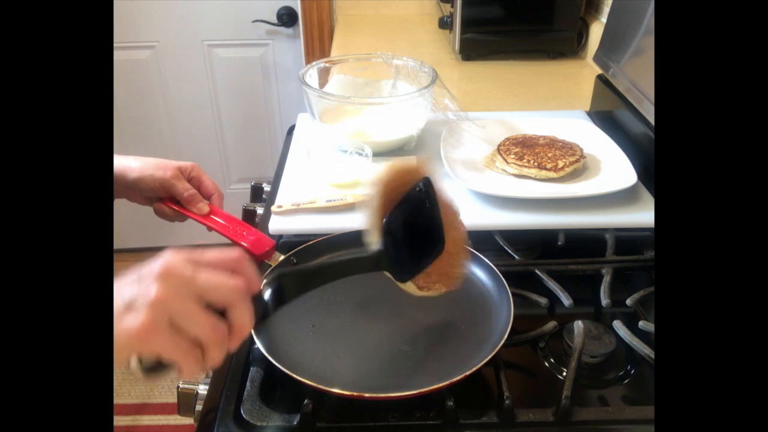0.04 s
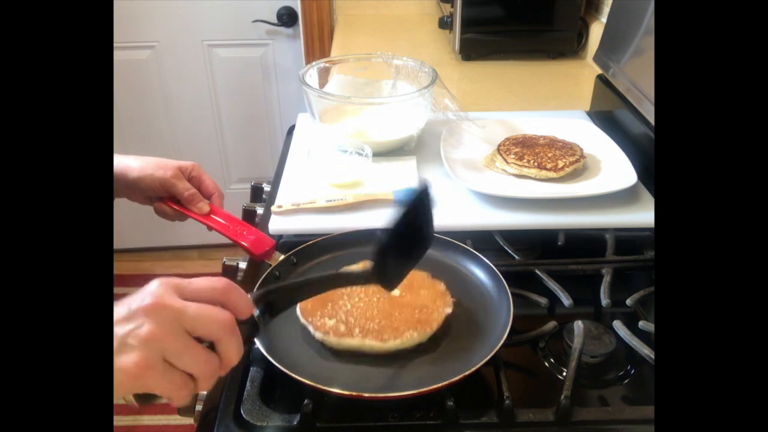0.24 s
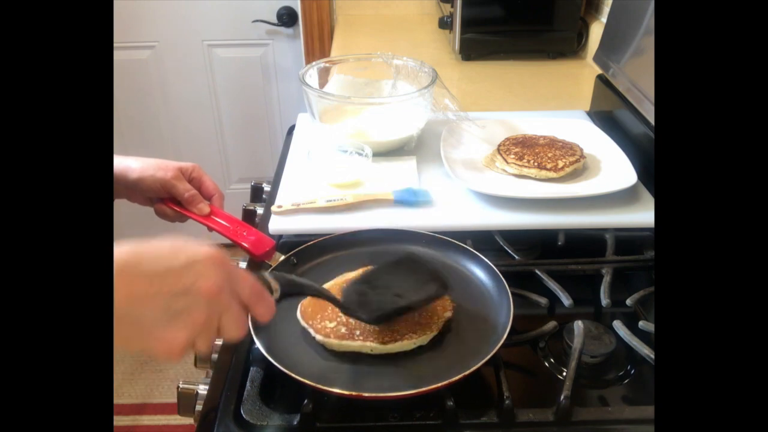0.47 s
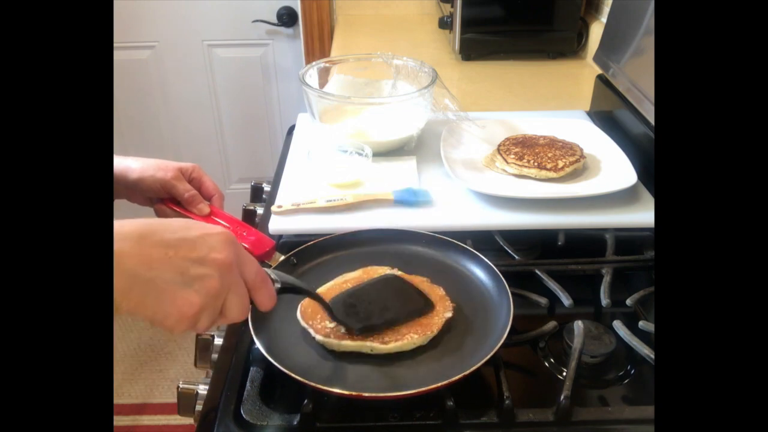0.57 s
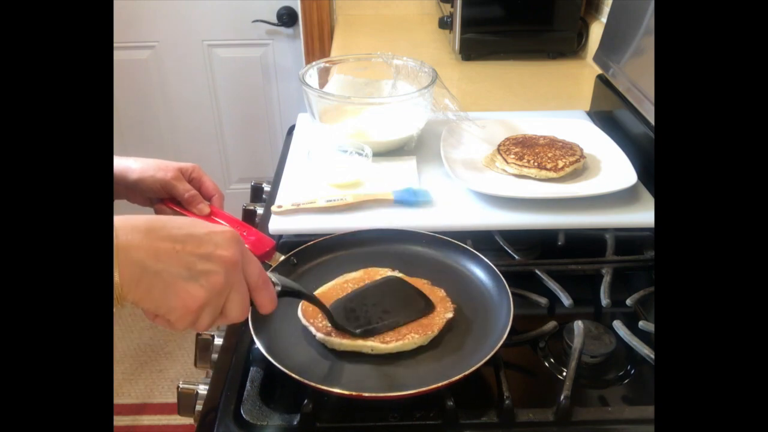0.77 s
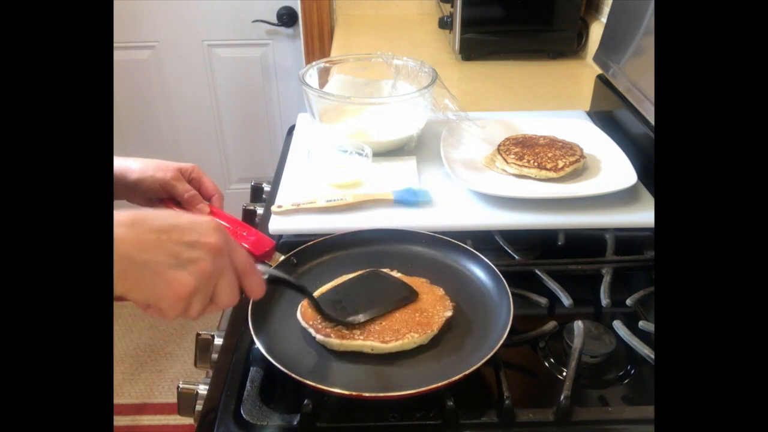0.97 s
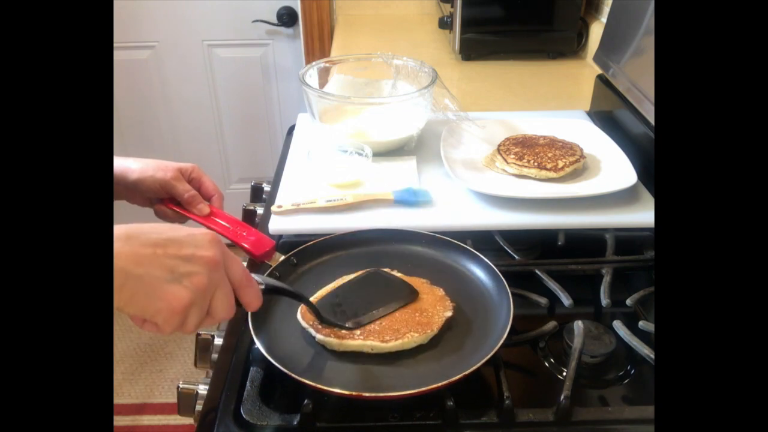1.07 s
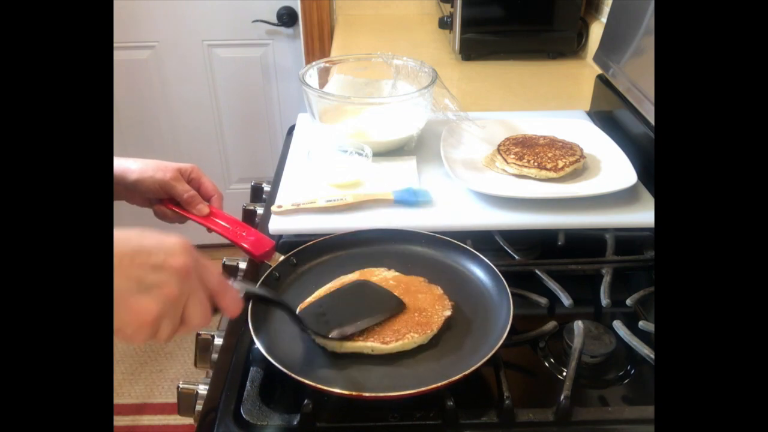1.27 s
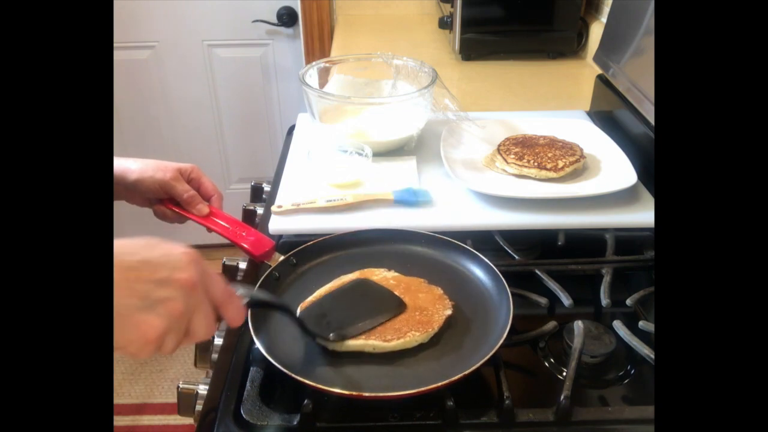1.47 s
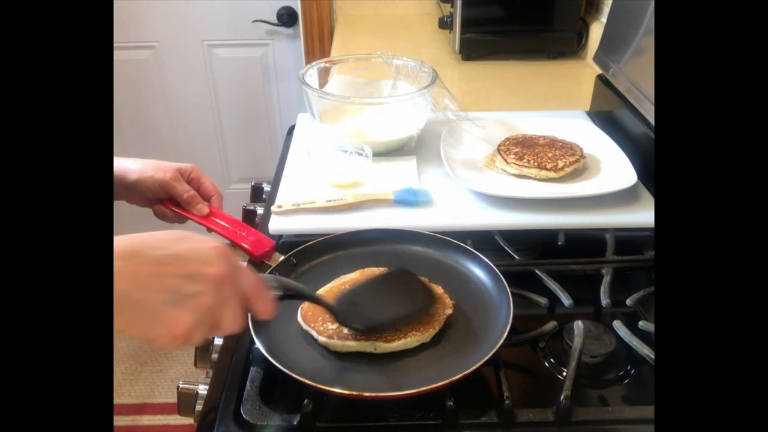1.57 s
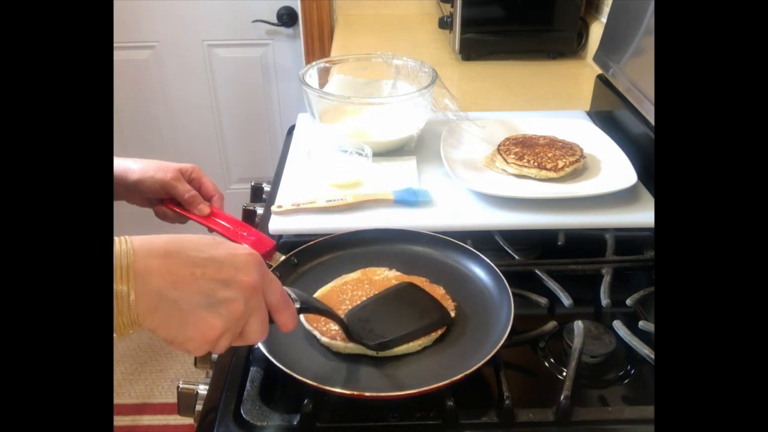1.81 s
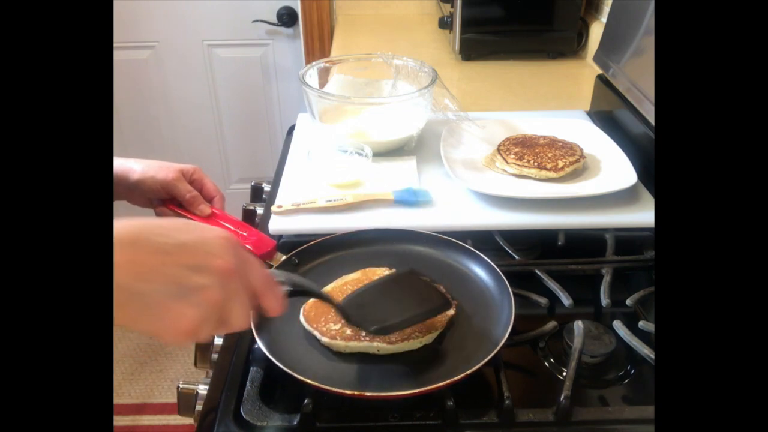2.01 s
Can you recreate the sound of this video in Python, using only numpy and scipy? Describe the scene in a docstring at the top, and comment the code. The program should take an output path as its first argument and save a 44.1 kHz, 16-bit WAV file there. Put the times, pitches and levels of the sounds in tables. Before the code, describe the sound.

Close above a stove, a spatula knocks a nonstick pan as a pancake slaps down; faint sizzling and crackles follow, then quiet pats and a duller knock, over steady appliance hum and light room hiss.

```python
"""At a kitchen stove, close above a nonstick pan, a pancake is flipped. The spatula knocks on the pan, which
rattles on its grate: damped modes, clacking noise and room. The cake smacks down and the stove top thumps.
The wet side sizzles (filtered random grains) and spits (clicks with noise tails) for about half a second.
The spatula pats the cake and bumps the pan once more, softly; a fainter sizzle returns.
An appliance hums throughout with a faint high whine, over rumble and hiss shaped from noise."""
import sys
import numpy as np
from scipy import signal
from scipy.fft import rfft, irfft
from scipy.io import wavfile

SR = 44100
rng = np.random.default_rng(int(sys.argv[2]) if len(sys.argv) > 2 else 0)


def int16_out(signal):
    """Quantize to a 16-bit WAV file."""
    q = np.round(np.clip(np.atleast_2d(signal).T, -1, 1) * 32767)
    wavfile.write(sys.argv[1], SR, q.astype(np.int16))


N = 90404  # samples
T = np.arange(N) / SR  # s


def from_db(db):
    """Decibels to gain."""
    return 10 ** (np.asarray(db) / 20)


def rms_one(x):
    """Scale to unit RMS level."""
    return x / np.sqrt(np.mean(x ** 2) + 1e-20)


def at_hz(points, hz):
    """Read a table on a log-frequency axis."""
    table_hz, values = np.transpose(points)
    return np.interp(np.log(np.maximum(hz, 1)), np.log(table_hz), values)


def cut(x, hz, kind, order=2):
    """Low- or high-pass with a Butterworth filter."""
    sos = signal.butter(order, min(hz, SR / 2 - 1000), kind, fs=SR, output="sos")
    return signal.sosfilt(sos, x + 1e-18)


def coloured(x, spectrum):
    """Give a steady noise a spectrum; unit RMS level."""
    gain = from_db(at_hz(spectrum, np.fft.rfftfreq(N, 1 / SR)))
    return rms_one(irfft(rfft(x) * gain, N))


def drift(rate_hz):
    """Random wander with spread 1, made of noise that rolls off above rate_hz."""
    rolloff = 1 + (np.fft.rfftfreq(N, 1 / SR) / rate_hz) ** 2
    return rms_one(irfft(rfft(rng.standard_normal(N)) / rolloff, N))


def add(out, s, x):
    """Mix x in at time s."""
    i = max(int(s * SR), 0)
    out[i:i + len(x)] += x[:N - i]


def ring(modes, t):
    """Struck modes as decaying sines, alternating in sign."""
    out = np.zeros(len(t))
    for k, (hz, db, t60) in enumerate(modes):
        out += (-1) ** k * from_db(db - 60 * t / t60) * np.sin(2 * np.pi * hz * t)
    return out


def dying_noise(spectrum, t60_at, t, ripple_db=0):
    """Countless close modes of random phase, each octave dying at its own rate from a common unit level."""
    hz = np.fft.rfftfreq(len(t), 1 / SR)
    phases = np.exp(2j * np.pi * rng.random(len(hz)))
    lines = from_db(at_hz(spectrum, hz) + ripple_db) * phases
    lines = lines / np.std(irfft(lines, len(t)))
    edges = 45 * 2. ** np.arange(10)  # octave edges, Hz
    out = np.zeros(len(t))
    for lo, hi in zip(edges, edges[1:]):
        octave = irfft(lines * (hz >= lo) * (hz < hi), len(t))
        out += octave * from_db(-60 * t / t60_at(np.sqrt(lo * hi)))
    return out


def soft_blows(blows, body):
    """Cushioned blows that all ring the same body."""
    out = np.zeros(N)
    for s, db in blows:
        add(out, s, from_db(db) * body)
    return out


def appliance_hum():
    """One low tone whose level follows a slow curve plus a quick random waver."""
    # level of the hum before its waver: (time [s], RMS level [dB])
    hum_level = [(0, -51), (.2, -52.5), (.38, -55), (.64, -52), (.74, -53.5), (.8, -49.5), (.86, -53),
                 (.92, -52.5), (1.08, -52.5), (1.37, -51), (1.42, -56), (1.47, -50.5), (1.65, -52.5),
                 (1.93, -50), (1.985, -53.5), (2.03, -51.5)]
    hum_hz, waver_db, waver_hz = 389.6, 1.55, 43
    level_db = np.interp(T, *np.transpose(hum_level)) + waver_db * drift(waver_hz)
    return np.sqrt(2) * from_db(level_db) * np.sin(2 * np.pi * hum_hz * T)


def whine():
    """Thin high tones, each slightly blurred by a wandering phase."""
    # tones of the whine: (frequency [Hz], RMS level [dB])
    whine_tones = [(5841, -80), (7790, -89.5), (12850, -95), (13243, -86), (14411, -90)]
    phase_rate_hz = 6.1
    out = np.zeros(N)
    for hz, db in whine_tones:
        out += from_db(db) * np.sin(2 * np.pi * hz * T + drift(phase_rate_hz))
    return np.sqrt(2) * out


def room_air():
    """Steady rumble and hiss of the kitchen: noise given a spectrum."""
    # relative spectrum of rumble and hiss: (frequency [Hz], density [dB per Hz])
    air_spectrum = [(20, -42), (35, -8.5), (65, -3.5), (105, -5.5), (170, -12), (310, -10.5), (550, -17.5),
                    (950, -20.5), (1150, -18), (1600, -24), (4000, -26), (7000, -29), (8500, -34),
                    (11500, -34), (15500, -37)]
    air_db = -61
    return from_db(air_db) * coloured(rng.standard_normal(N), air_spectrum)


def scuff():
    """Short, dull rubs of the cake on the pan: filtered noise that swells, holds and dies."""
    # rubs: (time [s], level [dB], attack [s], hold [s]); the hold includes the attack
    scuffs = [(0.028, -51.5, 0.0022, 0.045), (1.901, -59.5, 0.027, 0.031)]
    # relative spectrum of the rubs: (frequency [Hz], density [dB per Hz])
    scuff_spectrum = [(150, -13), (300, 7), (480, -1.5), (700, -6.5), (850, 1.5), (1150, -7), (1450, -19.5),
                      (4000, -36)]
    scuff_t60_s = 0.29
    shape = np.zeros(N)
    for s, db, attack, hold in scuffs:
        fade_db = -60 * np.maximum(T - s - hold, 0) / scuff_t60_s
        shape += np.clip((T - s) / attack, 0, 1) * from_db(db + fade_db)
    return shape * coloured(rng.standard_normal(N), scuff_spectrum)


def knocks():
    """Contacts of spatula, pan and grate: each rings the pan, clacks and excites the kitchen."""
    # contacts: (time [s], level before filters [dB], low-pass [Hz], high-pass [Hz],
    #            pan ring [dB], clack t60 [s], room [dB])
    contacts = [(.0315, -32, 900, 500, -7, .04, -3), (.126, -26, 1080, 200, -6, .07, 0),
                (.232, -21, 700, 398, 1, 0.1, 20), (.2432, 0, 10200, 350, -11, 0.088, 1),
                (0.2514, 1.5, 3030, 268, 2.5, 0.07, 0.5), (0.2693, -5.5, 8900, 1800, -30, 0.086, 3),
                (.289, -9.5, 1180, 587, -14, 0.22, -14), (.318, -4.5, 730, 490, -17, .1, -15),
                (1.0375, -23.5, 9200, 300, -16, 0.034, -6), (1.3425, -29.5, 2780, 215, -3, .05, -10),
                (1.7231, -27, 6000, 885, -4, 0.072, -6.5), (1.738, -7, 1790, 376, -0.5, 0.11, 4.5),
                (1.812, -28, 1200, 350, -13, 0.065, 7)]
    # the pan on its grate: (frequency [Hz], relative level [dB])
    pan_modes = [(237, -0.5), (298, -3.5), (346, 2), (530, -26), (585, -7), (715, -5), (763, -3), (985, -6),
                 (1129, -6), (1481, -2), (1715, -3), (1830, -14), (2001, 2), (2140, -0.5), (2295, -2),
                 (3060, -10), (3784, -6), (4145, -4)]
    # the cake damps the pan, the high modes most: (frequency [Hz], t60 [s])
    pan_t60 = [(240, .26), (1000, .25), (1500, .17), (4000, .13)]
    # dense, quickly damped ring of pan and spatula: (frequency [Hz], relative density [dB per Hz])
    clack_spectrum = [(100, -3), (200, -15), (330, -11.5), (450, -10.5), (580, 7), (900, -11.5),
                      (1550, -1.5), (2000, -8.5), (2500, -12.5), (3100, -4.5), (4100, -10.5), (6000, -13),
                      (9000, -22), (15000, -18)]
    # the kitchen's answer: (frequency [Hz], relative density [dB per Hz])
    room_spectrum = [(100, -5), (200, 1), (400, -9.5), (650, -3.5), (1100, -7.5), (2000, -13), (4000, -17),
                     (8000, -31), (15000, -36)]
    # how long the kitchen rings: (frequency [Hz], t60 [s])
    room_t60 = [(100, .45), (500, .29), (2000, .3), (6000, .26), (15000, .22)]
    pan_db, clack_db, room_base_db = -37, -24.5, -32
    room_build_s, ripple_db, ripple_step_hz = 0.016, 4.5, 12

    out, t = np.zeros(N), T[:2 ** 15]
    pan = ring([(hz, db, at_hz(pan_t60, hz)) for hz, db in pan_modes], t)
    # some room modes stand out: random steps up or down along frequency
    hz = np.fft.rfftfreq(len(t), 1 / SR)
    signs = rng.choice([-1, 1], len(hz))
    ripple = ripple_db * np.interp(hz / ripple_step_hz, np.arange(len(hz)), signs)
    build = 1 - np.exp(-t / room_build_s)
    for s, db, dull_hz, thin_hz, ring_db, clack_t60, room_db in contacts:
        pan_ring = from_db(pan_db + ring_db) * pan
        clack = from_db(clack_db) * dying_noise(clack_spectrum, lambda hz: clack_t60, t)
        reverb = dying_noise(room_spectrum, lambda hz: at_hz(room_t60, hz), t, ripple)
        room = from_db(room_base_db + room_db) * reverb * build
        dulled = cut(pan_ring + clack + room, dull_hz, "low")
        add(out, s, from_db(db) * cut(dulled, thin_hz, "high"))
    return out


def stove_thumps():
    """The stove top takes the weight and answers with low damped modes."""
    # thumps: (time [s], level before the low-pass [dB])
    thump_blows = [(.05, -53.5), (.124, -48.5), (.262, -38.5), (.33, -49), (1.038, -57.5), (1.765, -46.5)]
    # stove top: (frequency [Hz], relative level [dB], t60 [s])
    stove_modes = [(69.9, -9, 0.51), (101, -10, 0.53), (121.5, 2, 0.18)]
    soft_hz = 190
    return soft_blows(thump_blows, cut(ring(stove_modes, T), soft_hz, "low", order=4))


def pats():
    """The spatula pats the cake, which sounds as a dull damped body."""
    # pats: (time [s], level [dB])
    pat_blows = [(.126, -59), (1.038, -50.5), (1.343, -54)]
    # dull body: (frequency [Hz], relative level [dB], t60 [s])
    pat_modes = [(238, 0, 0.18), (317, -1, 0.11), (610, -7, 0.043)]
    return soft_blows(pat_blows, ring(pat_modes, T))


def landing_slap():
    """The cake lands flat: the damped smack of the loaded pan."""
    # landing: (time [s], level [dB])
    slap_blows = [(.2436, -20)]
    # loaded pan: (frequency [Hz], relative level [dB], t60 [s])
    slap_modes = [(530, -2, 0.047), (657, -3.5, 0.045)]
    return soft_blows(slap_blows, ring(slap_modes, T))


def sizzle():
    """Thousands of tiny steam bursts a second under the wet side: random grains given a spectrum."""
    # spells of sizzle: (fade-in start [s], fade-out start [s], level [dB])
    spells = [(0.283, .708, -59), (1.77, 2.053, -67)]
    # relative spectrum of the sizzle: (frequency [Hz], level [dB])
    sizzle_spectrum = [(300, 11), (600, 7), (1500, 2), (4000, -0.5), (5900, -0.5), (8300, -6),
                       (11500, -7.5), (15500, -12)]
    grains_per_s, grain_spread_db = 9000, -0.5
    attack_s, release_s = 0.039, 0.01
    born = rng.random(N) < grains_per_s / SR
    strength = rng.standard_normal(N)
    spread = from_db(grain_spread_db * np.minimum(rng.exponential(1, N), 5))
    grains = born * strength * spread
    level = np.zeros(N)
    for start, stop, db in spells:
        fade_in = np.clip((T - start) / attack_s, 0, 1)
        fade_out = np.clip(1 - (T - stop) / release_s, 0, 1)
        level += from_db(db) * fade_in * fade_out
    return level * coloured(grains, sizzle_spectrum)


def spits():
    """A fat droplet bursts: one bright snap and a short spray of reflections, as decaying noise."""
    # spits: (time [s], level before the high-pass [dB])
    bursts = [(0.3083, -20.5), (0.3456, -41), (.3815, -34), (.4284, -19.5)]
    low_hz, tail_db, tail_t60_s = 3700, -32.5, 0.16
    out = np.zeros(N)
    for s, db in bursts:
        snap = from_db(tail_db - 60 * T / tail_t60_s) * rng.standard_normal(N)
        snap[0] = 1
        add(out, s, from_db(db) * cut(snap, low_hz, "high"))
    return out


def scene():
    """Everything at one microphone above the stove."""
    background = appliance_hum() + whine() + room_air()
    blows = knocks() + stove_thumps() + pats() + landing_slap()
    return (background + scuff() + blows + sizzle() + spits())[None]


def record(dry):
    """The deepest bass falls away; the microphone has two narrow dips, and the top is cut steeply."""
    # dips of the microphone: (frequency [Hz], depth [dB], width [Hz])
    mic_dips = [(4846, -5.5, 186), (10460, -7, 660)]
    low_cut_hz, top_hz = 39, 15900
    x = cut(dry, low_cut_hz, "high", order=4)
    for hz, db, width_hz in mic_dips:
        band = signal.lfilter(*signal.iirpeak(hz, hz / width_hz, fs=SR), x)
        x = x + (from_db(db) - 1) * band
    # elliptic low-pass: 0.1 dB ripple, 70 dB rejection
    top_cut = signal.ellip(10, .1, 70, top_hz, fs=SR, output="sos")
    return signal.sosfilt(top_cut, x)


dry = scene()
out = record(dry)
int16_out(out)
```